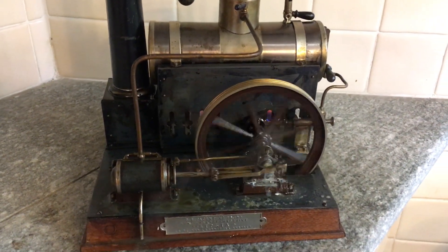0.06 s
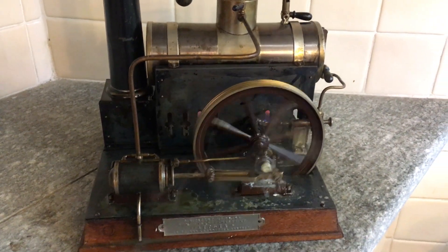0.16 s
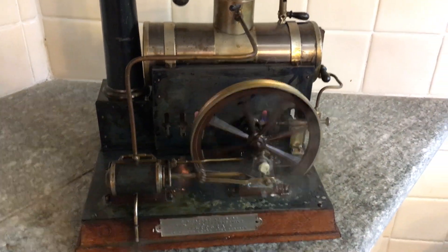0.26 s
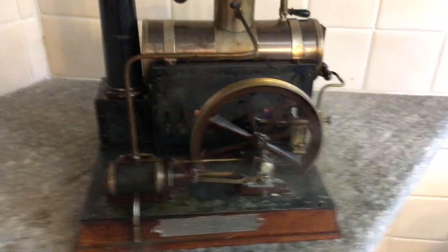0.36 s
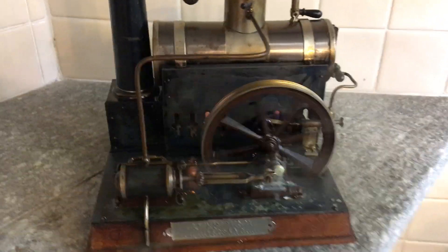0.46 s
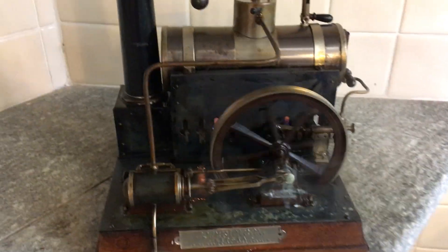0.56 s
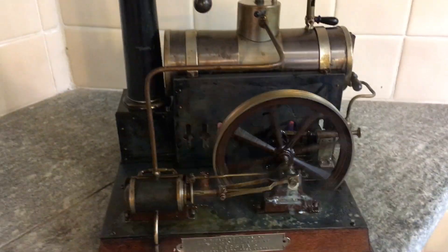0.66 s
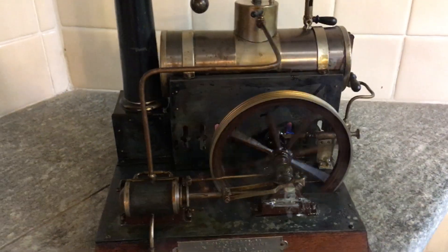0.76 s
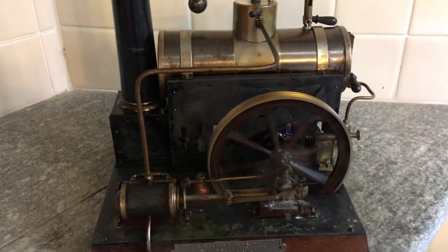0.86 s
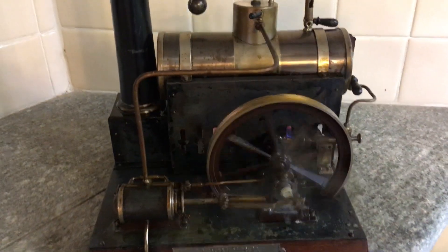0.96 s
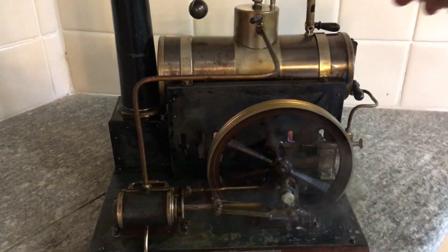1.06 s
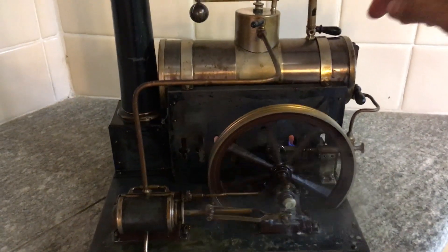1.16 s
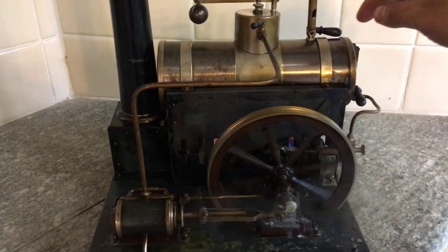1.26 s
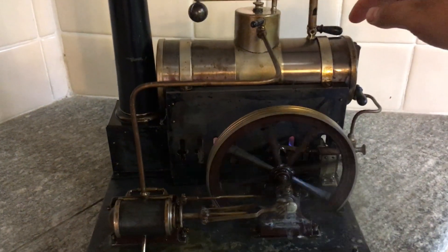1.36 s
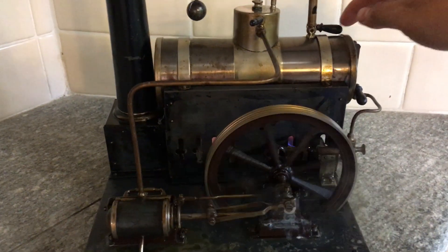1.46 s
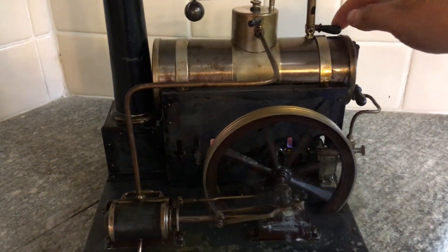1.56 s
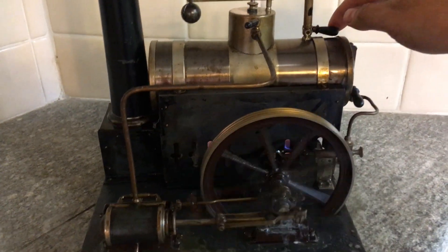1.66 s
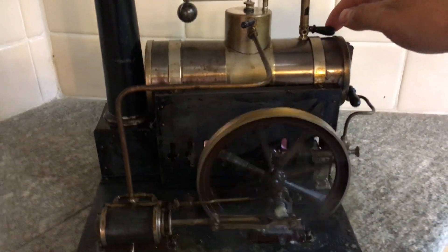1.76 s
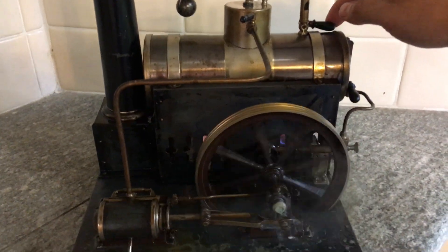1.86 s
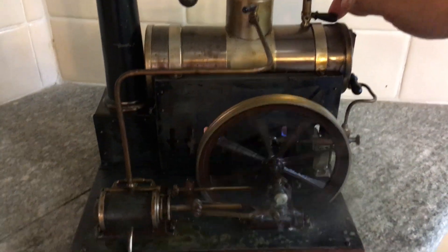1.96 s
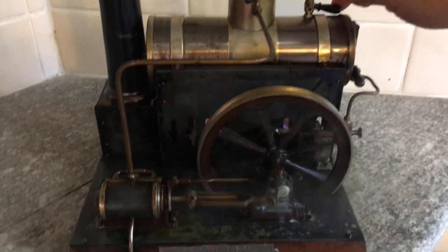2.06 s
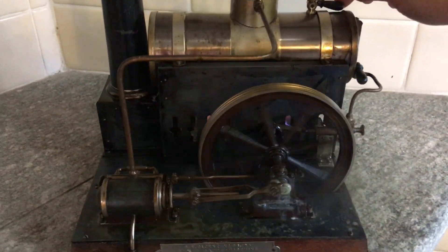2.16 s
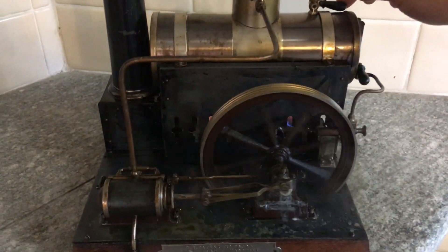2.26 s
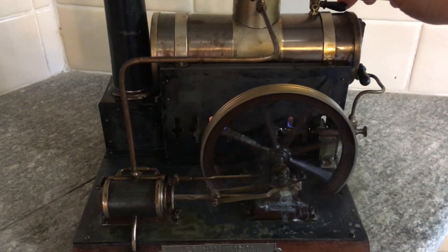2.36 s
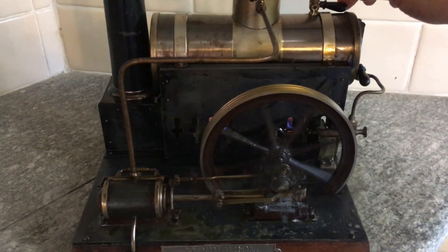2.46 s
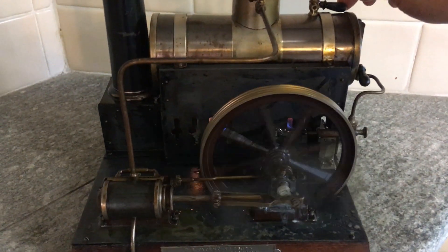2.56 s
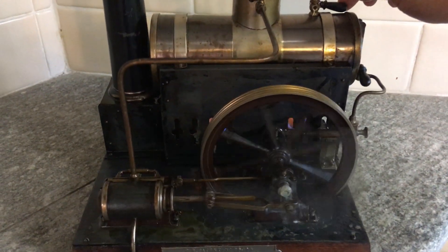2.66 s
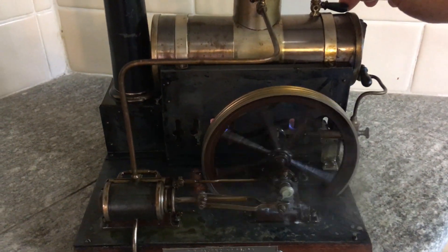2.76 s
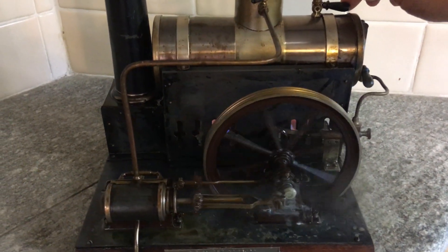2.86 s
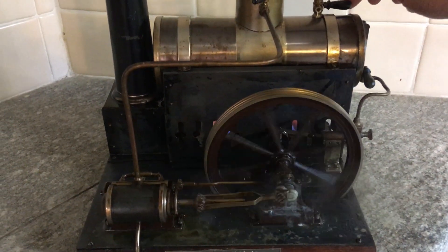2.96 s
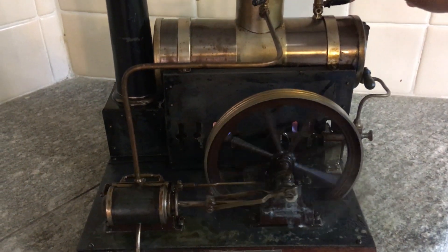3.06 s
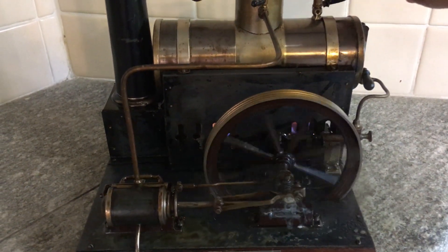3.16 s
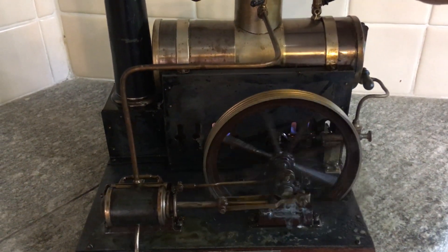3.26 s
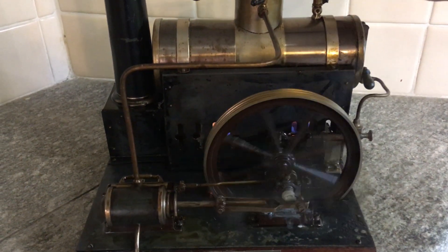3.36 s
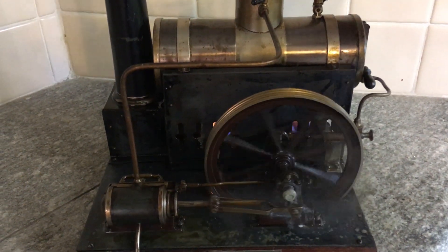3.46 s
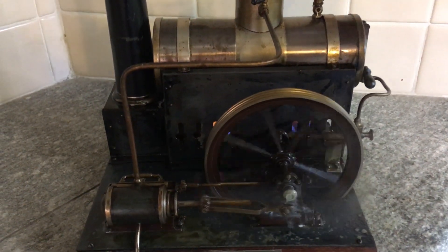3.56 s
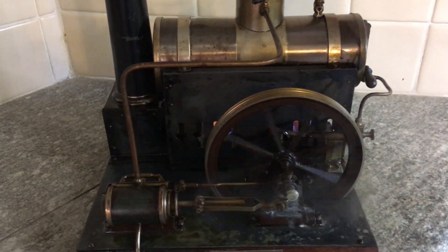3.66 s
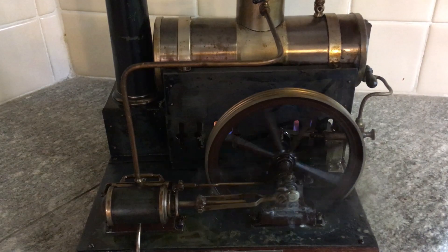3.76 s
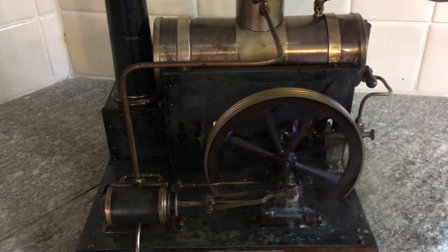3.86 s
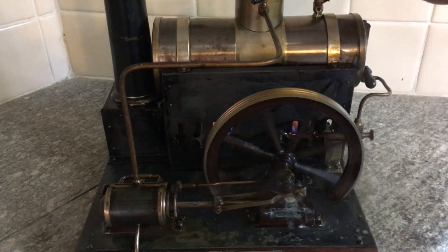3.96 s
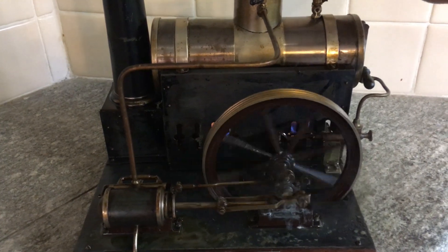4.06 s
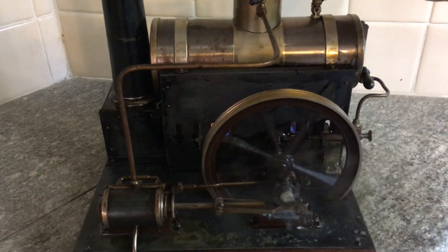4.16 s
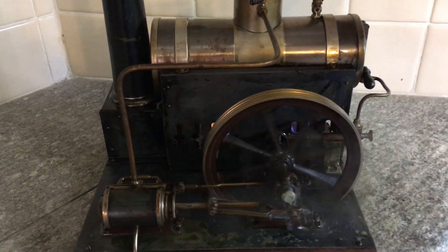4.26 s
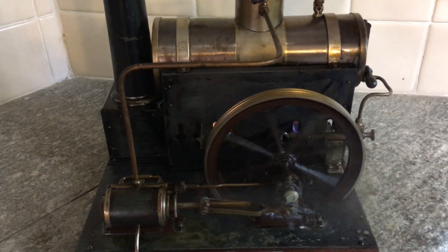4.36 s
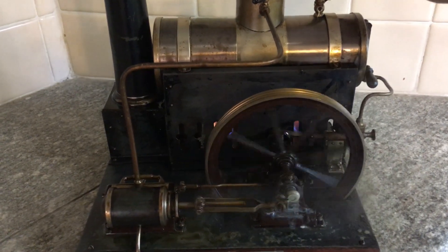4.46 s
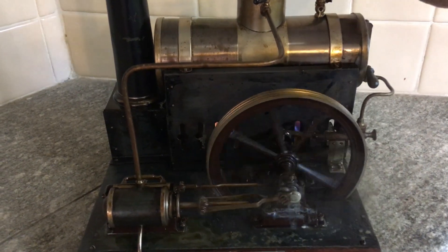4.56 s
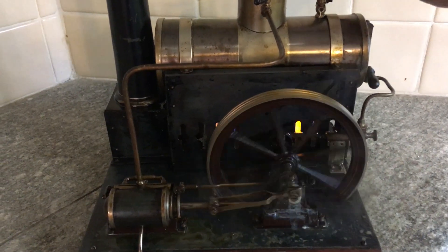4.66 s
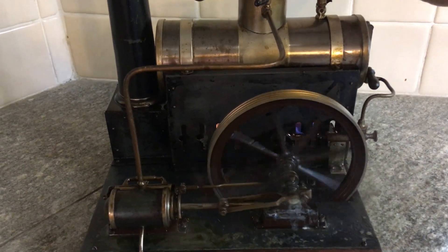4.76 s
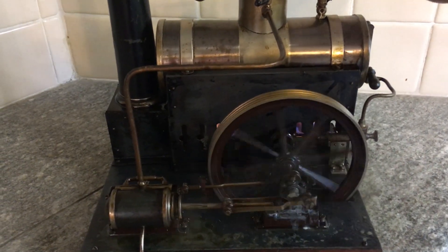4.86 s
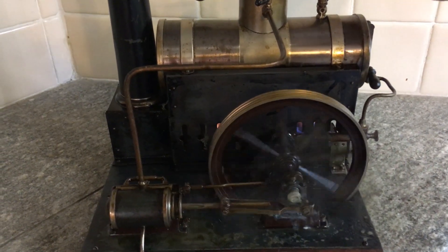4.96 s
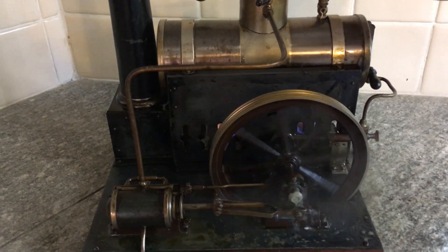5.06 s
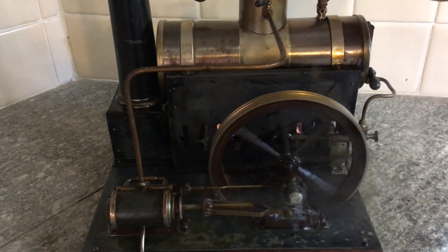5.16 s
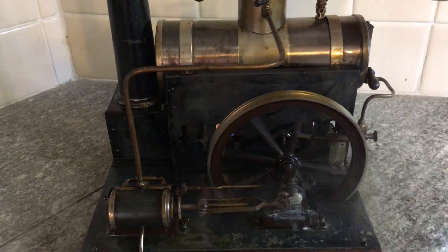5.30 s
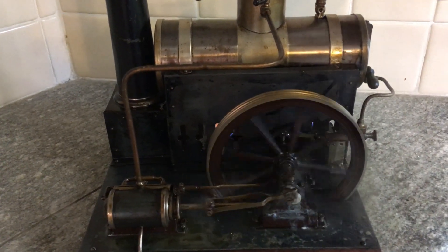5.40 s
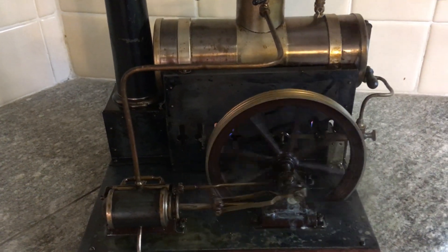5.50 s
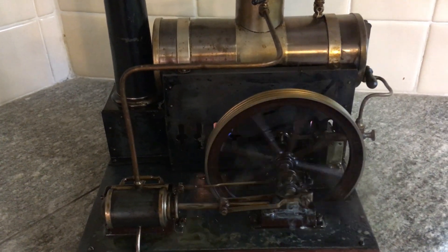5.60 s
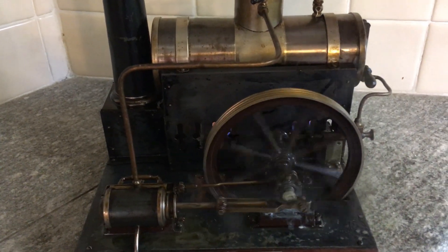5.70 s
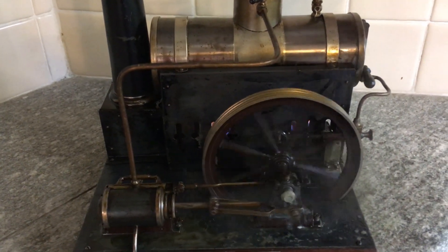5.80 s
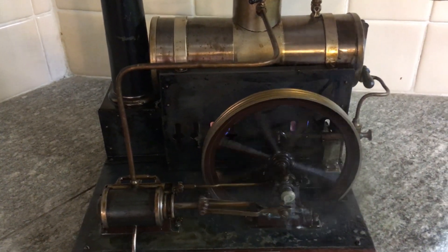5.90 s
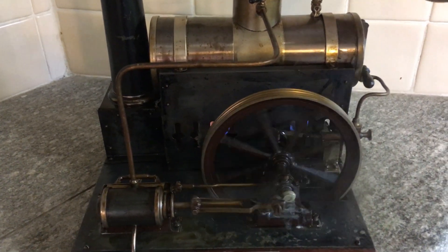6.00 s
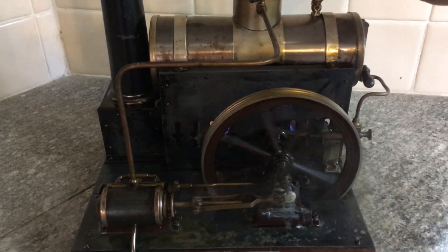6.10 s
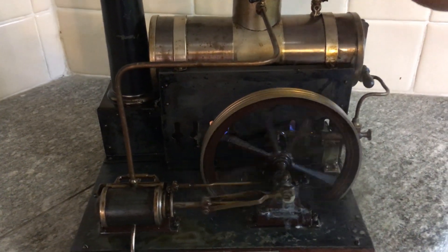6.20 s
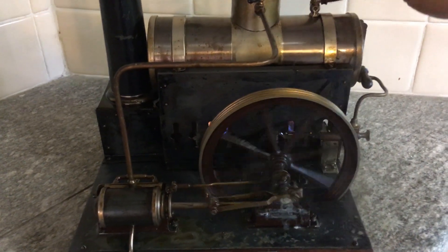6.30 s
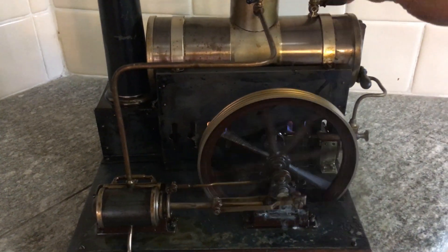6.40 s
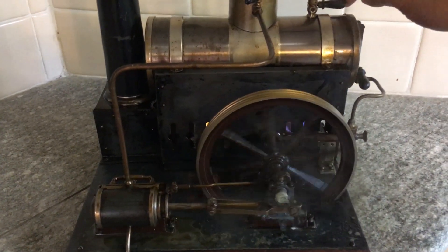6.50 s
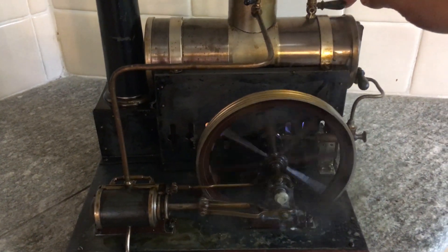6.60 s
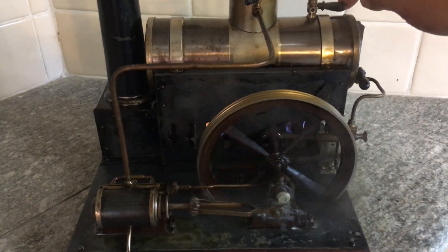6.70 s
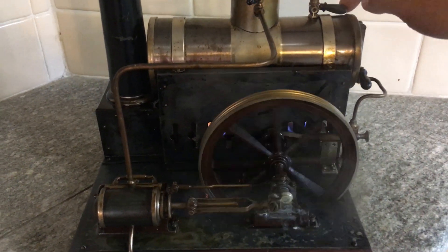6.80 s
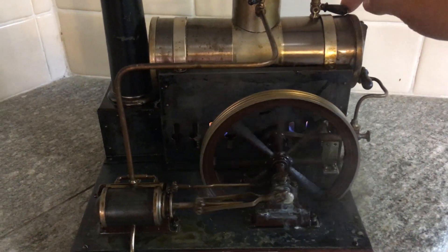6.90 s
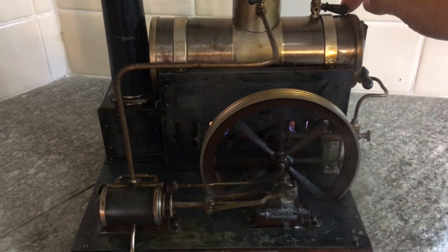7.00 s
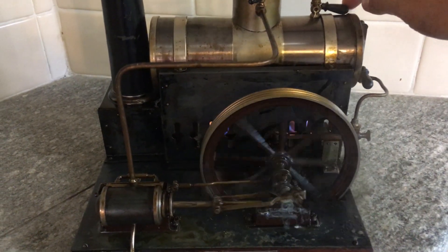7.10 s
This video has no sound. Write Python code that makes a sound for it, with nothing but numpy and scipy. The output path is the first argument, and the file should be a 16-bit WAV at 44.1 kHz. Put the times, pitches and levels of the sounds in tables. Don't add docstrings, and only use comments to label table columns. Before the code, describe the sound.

Light metallic crank knocks and thin steam hiss on a kitchen counter, interrupted by two short piercing whistle toots and one long one.

```python
import sys
import numpy as np
from scipy import signal
from scipy.fft import rfft, irfft
from scipy.io import wavfile
from scipy.ndimage import uniform_filter1d

SR = 44100
rng = np.random.default_rng(int(sys.argv[2]) if len(sys.argv) > 2 else 0)


def log_audio(samples):
    frames = np.atleast_2d(samples).T
    limited = np.clip(frames, -1, 1)
    pcm = np.round(limited * 32767).astype(np.int16)
    wavfile.write(sys.argv[1], SR, pcm)


def field_ratio(decibels):
    return 10 ** (np.asarray(decibels, dtype=float) / 20)


N = 314874
T = np.arange(N) / SR


def unit(x):
    return x / np.sqrt(np.mean(x ** 2))


def coloured(points, peaks=(), lift_db=0):
    f = np.maximum(np.fft.rfftfreq(N, 1 / SR), 1)
    hz, db = np.transpose(points)
    gain = field_ratio(np.interp(np.log(f), np.log(hz), db, left=-120, right=-120))
    resonances = sum(field_ratio(d + lift_db) / (1 + (2 * (f - c) / w) ** 2) for c, w, d in peaks)
    return unit(irfft(rfft(rng.standard_normal(N)) * gain * (1 + resonances), N))


def walk(rate_hz):
    k = max(int(SR / rate_hz), 1)
    return unit(uniform_filter1d(uniform_filter1d(rng.standard_normal(N), k), k))


def add(out, start_s, x):
    i = int(start_s * SR)
    out[i:i + len(x)] += x[:N - i]


def ring(modes, rise_s=0.000077, detune=0.037):
    t = T[:5000]
    luck = rng.standard_normal((len(modes), 3))
    y = np.zeros(len(t))
    for (hz, db, t60_s), (louder, sharper, turn) in zip(modes, luck):
        tone = np.sin(2 * np.pi * hz * (1 + detune * sharper) * t + 1.4 * turn)
        y += field_ratio(db + 2 * louder) * tone * 1000 ** (-t / t60_s)
    y = y * (1 - np.exp(-t / rise_s))
    return y / np.abs(y).max()


def glides(rows, rough):
    out, wobble = np.zeros(N), walk(153)
    for start_s, end_s, from_hz, to_hz, db in rows:
        i, n = int(start_s * SR), int((end_s - start_s) * SR)
        phase = 2 * np.pi * np.cumsum(np.linspace(from_hz, to_hz, n)) / SR
        swell = np.sqrt(2) * signal.windows.tukey(n, .6)
        tone = np.sin(phase + rough * wobble[-i - n:-i])
        add(out, start_s, field_ratio(db) * swell * (1 + rough * wobble[i:i + n]) * tone)
    return out


def room(x, t60_s=1.0, wet_db=-40):
    t = T[:int(t60_s * SR)]
    tail = rng.standard_normal(len(t)) * 1000 ** (-t / t60_s) * np.minimum(t / 0.0056, 1)
    return x + field_ratio(wet_db) * signal.fftconvolve(x, tail / np.sqrt(np.sum(tail ** 2)))[:N]


# freq_hz, level_db
LEAK_SPECTRUM = [(82, -46.5), (140, -16), (178, -9.5), (441, -12.5), (752, -12.5), (1140, -9),
                 (1230, -11.5), (3190, -14), (3960, -12), (6120, -6), (7310, -9), (11500, -1),
                 (15800, -4.5)]
# freq_hz, width_hz, level_db
LEAK_PEAKS = [(3180, 520, -2), (5810, 790, -30), (8600, 380, 2), (9610, 80, 10.5), (10600, 34, 4.5),
              (11400, 92, -1.5), (11660, 70, 2.5), (13170, 630, 1.5)]
# time_s, level_db
LEAK_SWELL = [(0, -2.5), (.5, -1), (1.3, -0.5), (2, -0.5), (2.7, 0.5), (3.3, -0.5), (6.5, -2), (7.14, 4.5)]
# freq_hz, level_db
RUMBLE = [(18, -42), (32, -23.5), (44, -6), (55, -1), (80, -8.5), (120, -9), (170, -30.5)]


def kitchen():
    leak = rfft(coloured(LEAK_SPECTRUM, LEAK_PEAKS, lift_db=-1))
    octave = np.log2(np.fft.rfftfreq(N, 1 / SR) + 20)
    swell_db = np.interp(T, *np.transpose(LEAK_SWELL)) + 0.33 * walk(5.3) + .8 * walk(31)
    centres = np.r_[6:13:.5, 13:14.1:.14]
    steam = np.zeros(N)
    for c in centres:
        band = irfft(leak * np.interp(octave, centres, centres == c, left=0), N)
        flicker_db = 1.2 * walk(3) + 1.3 * walk(16) if c >= 13 else 1.1 * walk(9)
        steam += band * field_ratio((c > 11) * swell_db + flicker_db)
    hum_hz, throb_hz, throb_s = 99.7, 1.655, .05
    throb = 1 + 0.24 * np.cos(2 * np.pi * throb_hz * (T - throb_s))
    hum = throb * np.sin(2 * np.pi * hum_hz * T)
    return field_ratio(-45.5) * steam + field_ratio(-63.0) * coloured(RUMBLE) + field_ratio(-57.5) * hum


# time_s, level_db, click_db
BUMPS = [
    (0.3707, -28, -1),
    (0.526, -67, -9),
    (1.97, -42, 4),
    (4.422, -65, -5),
    (4.561, -59, -20),
    (3.559, -48, -8),
    (3.659, -56, -23),
    (4.971, -55, -25),
    (6.04, -65, -25),
]


def bumps():
    out = np.zeros(N)
    for s, db, click_db in BUMPS:
        modes = [(119, -7.0, 0.049), (258, 1.0, 0.0083), (1190, click_db, 0.0071), (2080, click_db - 7.5, 0.0096)]
        add(out, s, -field_ratio(db) * ring(modes, detune=.01))
    return out


# time_s, level_db, length_s
PUFFS = [
    (2.648, -36, 0.088),
    (6.464, -53.5, 0.022),
    (6.884, -54, 0.016),
    (6.998, -45, 0.016),
    (7.024, -56, 0.012),
]


def puffs():
    out, hiss = np.zeros(N), coloured([(2500, -4), (4000, -0.5), (9000, 4), (15500, 4.5)])
    for s, db, length_s in PUFFS:
        add(out, s - length_s / 3, field_ratio(db - 6.5) * np.hanning(int(length_s * SR)))
    return out * hiss


# time_s, peak_db, base_ring_re_peak_db, ring_length_s
HARD = [
    (0.613, -34.5, -9.5, 0.019),
    (1.416, -32, -13, 0.016),
    (2.218, -34, -12.5, 0.024),
    (3.022, -34, -13, 0.027),
    (3.824, -58, -13, 0.027),
    (4.616, -51.5, -14, 0.027),
    (5.395, -60, -10, 0.016),
    (6.158, -56, -15, 0.014),
    (6.922, -40, -10.5, 0.02),
]
# time_s, peak_db, base_ring_re_peak_db, ring_length_s
SOFT = [
    (0.1216, -32, -13, 0.018),
    (0.9133, -38.5, -9.5, 0.026),
    (1.719, -34, -13, 0.02),
    (2.5208, -34.5, -14.5, 0.02),
    (3.329, -36.5, -9.5, 0.0168),
    (4.138, -59, -9.5, 0.021),
    (6.448, -52, -14.5, 0.019),
]
# freq_hz, level_db, t60_s
HARD_MODES = [(1058, 9.5, 0.023), (740, -15, 0.015), (462, -5.5, 0.049), (1430, -5.5, 0.038),
              (1840, -0.5, 0.022), (2390, -2.5, 0.031), (2710, -10, 0.0096), (3200, -3, 0.012),
              (3660, -7, 0.0059), (4340, -2, 0.007), (1300, -10, 0.016)]
# freq_hz, level_db, t60_s
SOFT_MODES = [(1155, 5.5, 0.02), (1500, 7.5, 0.0082), (2047, 8, 0.01), (2380, -2, 0.0062), (3200, -5, .01),
              (423, -6, 0.033)]
# time_s, peak_db, pitch_hz
TICKS = [(0.091, -56, 1150), (0.742, -47.5, 896), (0.767, -44.5, 900), (1.483, -44, 1300),
         (1.497, -47, 905), (1.534, -48, 929), (1.553, -47, 1020), (1.576, -51, 899), (2.304, -48, 1030),
         (2.331, -51, 988), (2.373, -48.5, 880), (3.14, -47, 1070), (3.168, -46.5, 1020),
         (3.31, -28.5, 1880), (6.292, -60, 1080), (6.431, -59, 1990), (7.012, -47.5, 970),
         (7.076, -49, 1046)]
# start_s, end_s, from_hz, to_hz, level_db
SQUEAKS = [
    (1.04, 1.24, 1122, 1173, -64),
    (1.78, 1.85, 1880, 1873, -65),
    (1.93, 2.07, 1010, 972, -65),
    (2.62, 2.69, 1460, 1500, -61.5),
    (2.65, 2.74, 1334, 1440, -61),
    (2.69, 2.72, 2800, 2800, -61.5),
]


def crank():
    out = np.zeros(N)
    for rows, modes, main_db, swell_s in (HARD, HARD_MODES, 1.5, .002), (SOFT, SOFT_MODES, -4, .01):
        rattle = [(-.007, -15), (-.001, -8.5), (.0015, main_db), (.006, -10.5),
                  (.012, -13), (.018, -15), (.027, -21.5), (.04, -30.5)]
        for s, db, base_db, hold_s in rows:
            for lag_s, blow_db in rattle:
                at_s = s + lag_s + .0006 * rng.standard_normal()
                add(out, at_s, field_ratio(db + blow_db) * ring(modes, rise_s=0.0006, detune=0.07))
            counter = ring([(279, -0.5, .07), (330.5, -6, 0.03)], rise_s=0.0057)
            add(out, s + .014, field_ratio(db + main_db - 23) * counter)
            t = T[:4000]
            stop_db = -22 * np.clip((t - hold_s - .004) / .005, 0, 1)
            shape = (1 - np.exp(-t / swell_s)) * field_ratio(stop_db + 2.5 - 60 * t)
            shape = shape * np.exp(-np.maximum(t - hold_s, 0) / .02)
            phase = 2 * np.pi * 600 * np.cumsum(1 + .3 * np.exp(-t / .005) - 6.5 * t) / SR
            beat = 1 - .2 * np.cos(2 * np.pi * 55 * t + 1.5 + .5 * rng.standard_normal())
            add(out, s, field_ratio(db + base_db) * shape * beat * np.sin(phase))
    for s, db, hz in TICKS:
        modes = [(hz, 0, .012), (1.1 * hz, -3, .009), (0.84 * hz, -3, .009), (1.3 * hz, -6, .008)]
        add(out, s, field_ratio(db) * ring(modes, detune=0.012))
    return out + glides(SQUEAKS, rough=.55)


# speaks_s, dies_s, opening_s, closing_s
BLASTS = [
    (3.433, 3.864, .029, .012),
    (4.115, 4.474, .033, .013),
    (4.818, 6.113, .042, .024),
]


def blasts(tables):
    which = np.searchsorted([dies_s + .07 for _, dies_s, _, _ in BLASTS[:-1]], T)
    curves = [np.interp(T, *np.transpose(t)) if len(t) < N else t for t in tables]
    return np.choose(which, curves)


# time_s, held_pitch_hz
HELD = [
    [(3.43, 4960), (3.5, 4870), (3.54, 4915), (3.6, 5025), (3.652, 5030), (3.712, 4986), (3.778, 4950),
     (3.85, 4930)],
    [(4.3, 4866), (4.376, 4850), (4.41, 4825)],
    [(5.02, 5005), (5.195, 4950), (5.253, 4990), (5.352, 4995), (5.4, 4947), (5.685, 4986), (5.747, 4936),
     (5.87, 4962), (6.0, 4860)],
]


def pitch():
    rise_hz, drop_hz, knee, lead_s = 1650, 1950, 2, .006
    soft = lambda x: np.logaddexp(0, x)
    under_hz, on = [], 0
    for a, b, opening_s, closing_s in BLASTS:
        climb_hz = rise_hz * np.exp(np.minimum((a - T) / opening_s, 1))
        fall_hz = drop_hz * soft((T - b) / closing_s + knee) / soft(knee)
        under_hz.append(climb_hz + fall_hz)
        on = on + np.interp(T, [a - 2 * lead_s, a, b - lead_s, b + lead_s], [0, 1, 1, 0])
    return np.maximum(blasts(HELD) - blasts(under_hz), 2000), on


# freq_hz, level_db
JET_TOP = [(8500, -16.5), (9300, -2.5), (10500, -9), (12000, -5.5), (13200, 2), (14500, -2.5),
           (15800, -2.5)]
# freq_hz, level_db
JET_MID = [(5000, 3.5), (5900, 2), (6500, -3), (7600, -7.5), (8500, -6.5), (9500, -20.5)]
# freq_hz, level_db
JET_LOW = [(600, -41.5), (900, -31), (1500, -17), (2300, -19.5), (2700, -11), (3500, -5), (4300, -2),
           (5000, 1)]
# time_s, level_db
FLOW = [
    [(3.3, -56), (3.345, -38.5), (3.394, -27), (3.45, -21), (3.514, -36.5), (3.6, -31), (3.716, -41.5),
     (3.866, -47), (3.93, -59.5)],
    [(4.0, -63.5), (4.108, -36.5), (4.144, -37), (4.402, -43), (4.444, -45), (4.468, -46), (4.494, -49.5),
     (4.56, -76), (4.6, -69)],
    [(4.68, -64), (4.736, -52.5), (4.83, -37), (4.946, -40), (5.34, -39.5), (5.85, -37.5), (6.1, -46.5),
     (6.165, -58), (6.19, -62)],
]
BREATH_DB = (-10.5, -19, 0)
LINGER_DB = (-38, -41.5, -42)


def jet():
    free_db, locked_db = (-13, -12.5), (-7.5, -13)
    lock_hz, lock_span_hz, skirt_db = 4900, 500, -2
    breath_stops_s, linger_after_s, linger_db_per_s = .04, -.035, -75
    linger_hz, beats_hz, linger_wide_db = (4930, 4780, 4820), 200, -5
    db = np.interp(T, *np.concatenate(FLOW).T)
    first_s, last_s = FLOW[0][0][0], FLOW[-1][-1][0]
    gate = np.interp(T, [first_s - .05, first_s, last_s, last_s + .1], [0, 1, 1, 0])
    lock = np.clip(1 + (pitch()[0] - lock_hz) / lock_span_hz, 0, 1)
    mid_db, low_db = (a + (b - a) * lock for a, b in zip(free_db, locked_db))
    hiss = field_ratio(1.5) * coloured(JET_TOP)
    hiss = hiss + field_ratio(mid_db + 6.5) * coloured(JET_MID) + field_ratio(low_db + 3.5) * coloured(JET_LOW)

    edge = lambda s: np.clip((T - s) / .02, 0, 1)
    before = [field_ratio(d) * (1 - edge(a - breath_stops_s)) for (a, _, _, _), d in zip(BLASTS, BREATH_DB)]
    breath = gate * field_ratio(db) * blasts(before) + field_ratio(db + skirt_db) * lock

    ends_s = [a for a, _, _, _ in BLASTS[1:]] + [T[-1]]
    hang = np.zeros(N)
    for (_, dies_s, _, _), end_s, d in zip(BLASTS, ends_s, LINGER_DB):
        from_s = dies_s + linger_after_s
        fade = field_ratio(d + linger_db_per_s * np.maximum(T - from_s, 0))
        hang += edge(from_s) * (1 - edge(end_s)) * fade
    turn = 2 * np.pi * T * np.choose(np.searchsorted(ends_s[:-1], T), linger_hz)
    note = walk(beats_hz) * np.sin(turn) + walk(beats_hz) * np.cos(turn)
    breath = breath + field_ratio(linger_wide_db) * hang
    pipe = coloured([(3300, -38), (4300, -15.5), (4650, -5), (4850, -2), (5200, -6), (5600, -22),
                     (6500, -37.5), (9300, -39), (9650, -21), (10000, -40.5)])
    torn = gate * field_ratio(db + 1.0 * walk(40)) * hiss
    return torn + breath * field_ratio(0.46 * walk(40)) * pipe + field_ratio(-1) * hang * note


# start_s, end_s, from_hz, to_hz, level_db
STAGE = [
    (3.397, 3.437, 4530, 5810, -17.5),
    (3.86, 3.89, 5700, 4970, -44),
    (4.085, 4.118, 4900, 5560, -30.5),
    (4.465, 4.495, 5600, 4670, -41),
    (4.783, 4.822, 4840, 5520, -29.5),
    (6.1, 6.14, 5520, 4940, -40),
]
# freq_hz, level_db
BUFFET = [(25, -15.5), (45, 0), (120, -2.5), (200, -3), (600, -9), (1100, -13), (1500, -26.5)]
# time_s, level_db
BLOW = [
    [(3.44, 4), (3.461, 1), (3.467, 7), (3.482, -5.5), (3.53, -7.5), (3.585, -4), (3.655, -4.5),
     (3.715, -14), (3.8, -17)],
    [(4.16, -12), (4.21, -14), (4.24, -10.5), (4.4, -11.8), (4.44, -17), (4.47, -14)],
    [(4.87, -11), (5.02, -12), (5.2, -12.5), (5.4, -12), (5.75, -12), (6.0, -13), (6.05, -18), (6.1, -14)],
]
# pitch_hz, tone_db, second_db, third_db
SPEAKS = [(3000, -50, -70, -70), (3500, -35, -60, -60), (3950, -24, -50, -52), (4440, -18, -34, -42),
          (4550, -4, -27, -38), (4760, -.5, -24, -36), (4870, 0, -21, -29), (4945, -1.5, -27, -24),
          (4995, -4, -20, -24)]


def whistle():
    hz, gate = pitch()
    hz = uniform_filter1d(hz, size=300)
    at_hz, *answers = np.transpose(SPEAKS)
    db, second_db, third_db = (blasts(BLOW) + np.interp(hz, at_hz, a) for a in answers)
    loose = np.clip((4700 - hz) / 600, 0, 1)
    phase = 2 * np.pi * np.cumsum(hz * (1 + .0013 * walk(45))) / SR
    phase = phase + .09 * walk(220) + (.03 + .35 * loose) * walk(500)
    shake = field_ratio(.8 * walk(60) + .6 * walk(220)) * (1 + (.03 + .45 * loose) * walk(500))
    second = field_ratio(second_db + 3.5 + 2.78 * walk(67)) * np.sin(2 * phase)
    third = field_ratio(third_db + 2.0 * walk(50)) * np.sin(3 * phase)
    tone = field_ratio(db) * np.sin(phase) + field_ratio(-0.6 - 1 * loose) * (second + third)
    tone = tone + field_ratio(db - 61.0) * coloured(BUFFET)
    return np.sqrt(2) * gate * shake * tone + glides(STAGE, rough=.22)


def ducking():
    duck_db_per_s, duck_db, creep_db_per_s, late_s = -74.5, -24, 20.5, .01
    points, db, last_s = [(0, 0)], 0, 0
    for a, b, _, _ in BLASTS:
        a = a + late_s
        db = min(db + creep_db_per_s * (a - last_s), 0)
        points += [(a, db), (a + (duck_db - db) / duck_db_per_s, duck_db), (b, duck_db)]
        db, last_s = duck_db, b
    points.append((last_s - db / creep_db_per_s, 0))
    return field_ratio(np.interp(T, *np.transpose(points)))


def scene():
    steady = ducking() * kitchen()
    engine = room(crank(), t60_s=0.1, wet_db=-5.5)
    blown = room(whistle() + jet())
    return (steady + bumps() + puffs() + engine + blown)[None]


def band_limit(x):
    return signal.sosfilt(signal.butter(12, 15970, fs=SR, output="sos"), x)


def record(dry):
    return band_limit(dry)


dry = scene()
out = record(dry)
log_audio(out)
```